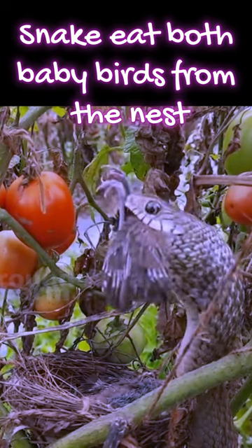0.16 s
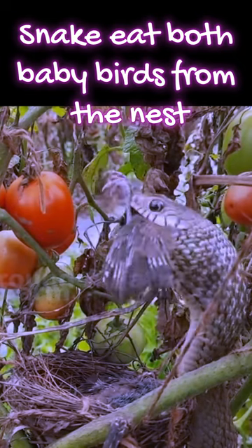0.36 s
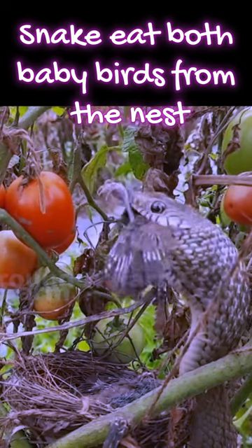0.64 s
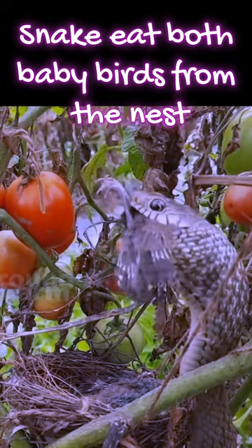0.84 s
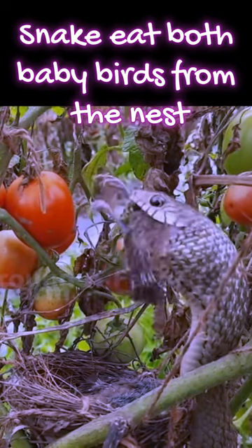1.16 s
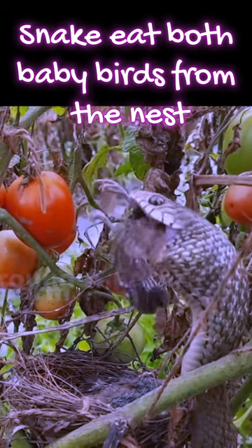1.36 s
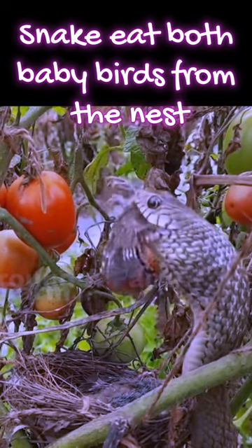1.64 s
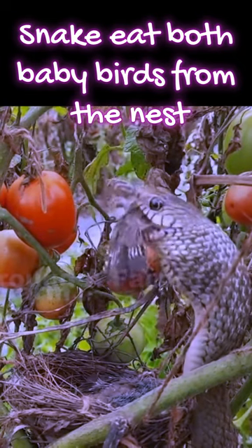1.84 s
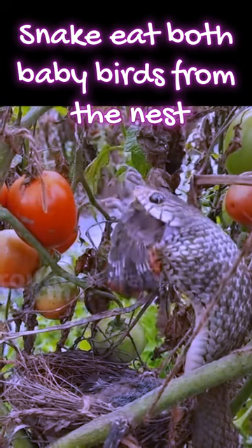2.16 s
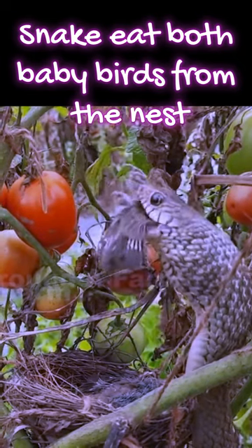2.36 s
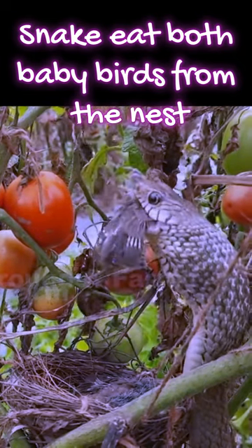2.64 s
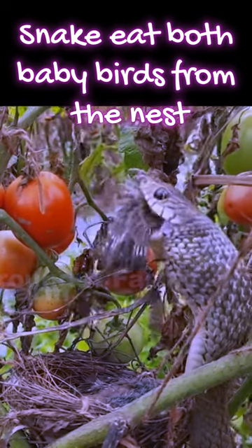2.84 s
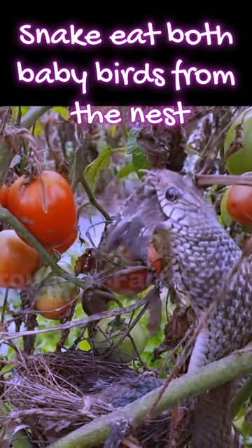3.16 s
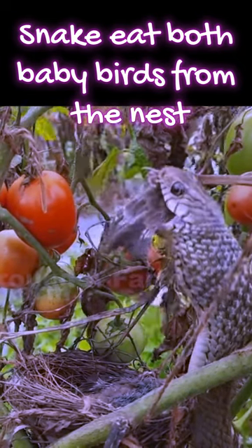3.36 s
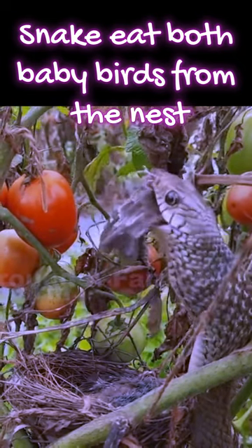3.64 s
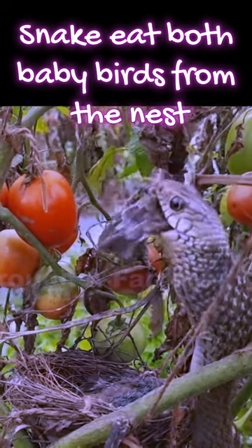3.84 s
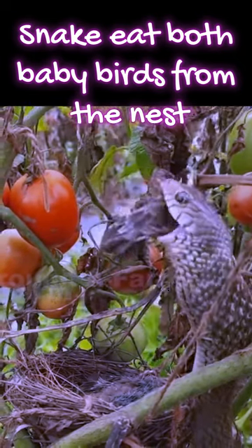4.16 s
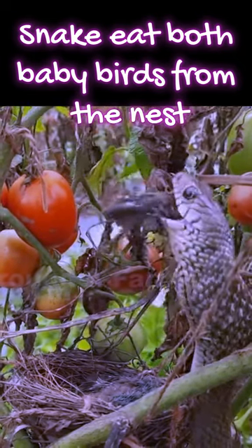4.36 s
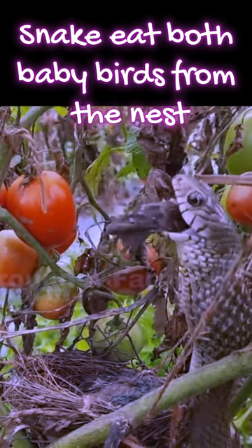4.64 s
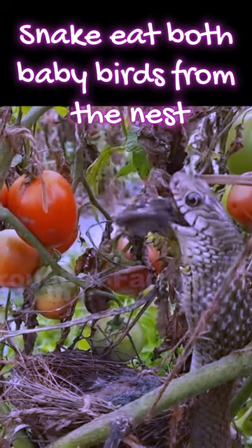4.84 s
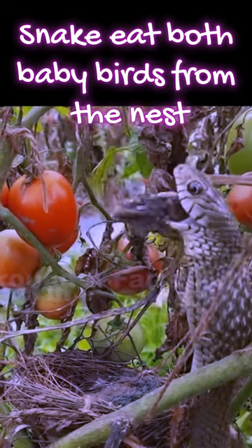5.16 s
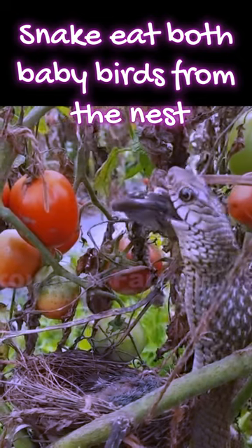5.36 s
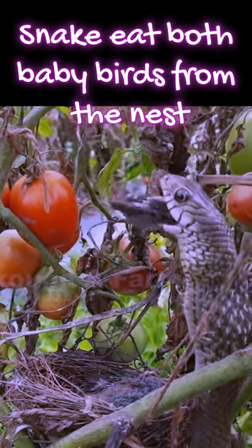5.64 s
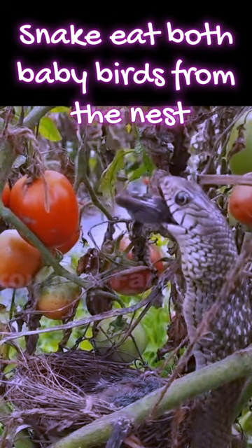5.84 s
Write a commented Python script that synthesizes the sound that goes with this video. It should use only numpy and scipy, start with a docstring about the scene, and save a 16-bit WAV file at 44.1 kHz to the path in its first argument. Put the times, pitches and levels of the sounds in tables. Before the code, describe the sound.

In a garden, one small bird scolds with very short, arched, slightly hoarse chirps in quick groups of three or four, with single notes between. It starts after almost a second of background. Beneath runs a deep, steady engine drone with a wavering low hum, distant traffic swelling and fading, and soft leaf hiss that turns brighter toward the middle. The stereo microphone hears the bird fairly close, slightly right, with little echo.

```python
"""Scolding bird in a vegetable garden

A small bird scolds in quick clusters of short arched chirps, harmonic tones with hiss, scattered by the plants.
A far engine drones near 63 Hz as a sum of sine orders; a wavering hum near 248 Hz, around the engine's
fourth order, booms and fades. Coloured noise makes distant traffic that swells and fades,
and foliage that hisses, with a brighter rustle of dry leaves toward the middle."""
import sys
import numpy as np
from scipy import signal
from scipy.fft import rfft, irfft
from scipy.io import wavfile
from scipy.ndimage import uniform_filter1d

SR = 44100
rng = np.random.default_rng(int(sys.argv[2]) if len(sys.argv) > 2 else 0)


def transcribe(signal):
    """Save signal, clipped to [-1, 1], as a 16-bit WAV file at the path in sys.argv[1]."""
    frames = np.atleast_2d(signal).T
    limited = np.clip(frames, -1, 1)
    pcm = np.round(limited * 32767).astype(np.int16)
    wavfile.write(sys.argv[1], SR, pcm)


N = 264732
TIME = np.arange(N) / SR


def from_db(db):
    """Logarithmic level: decibels become an amplitude ratio."""
    return 10 ** (np.asarray(db) / 20)


def rms_one(x):
    """Power normalization: scale to unit mean square."""
    return x / np.sqrt(np.mean(x ** 2) + 1e-20)


def in_time(rows):
    """Linear interpolation: each column of a curve at every sample."""
    seconds, *columns = np.transpose(rows)
    return [np.interp(TIME, seconds, column) for column in columns]


def at_hz(points, hz):
    """Logarithmic frequency scale: read a table in equal steps of pitch ratio."""
    table_hz, value = np.transpose(points)
    return np.interp(np.log(np.maximum(hz, 1)), np.log(table_hz), value)


def coloured(x, colour):
    """Zero-phase filtering: weight the spectrum by a table of (frequency [Hz], gain [dB])."""
    hz = np.arange(N // 2 + 1) * SR / N
    return irfft(rfft(x) * from_db(at_hz(colour, hz)), N)


def drift(corner_hz):
    """Low-pass noise: a random wander of rms 1 that slows as the corner is lowered."""
    hz = np.arange(N // 2 + 1) * SR / N
    spectrum = rfft(rng.standard_normal(N)) / (1 + (hz / corner_hz) ** 2)
    return rms_one(irfft(spectrum, N))


def add(out, start_s, sound):
    """Superposition: sum a short sound into the signal at its time."""
    i = int(start_s * SR)
    out[i:i + len(sound)] += sound


def outdoor_noise(colour, patchy_db, size=512):
    """Partial coherence: coloured noise at two microphones, uneven in patches of time and pitch; rms 1."""
    # coherence of the two channels: (frequency [Hz], likeness [clipped to 0-1])
    likeness = [(60, 2.6), (250, 0.23), (500, 1.14), (700, 0.7), (950, 0.9), (1300, 0.5), (1650, 0.08),
                (2300, 0), (3600, 0.29), (15000, -0.1)]
    # interchannel phase: (frequency [Hz], lead of left [rad])
    lead = [(60, 0.11), (350, 0.15), (550, 1.13), (700, 1.63), (870, 1.89), (1300, 2.65), (2000, 5.03),
            (3000, 4.7), (6800, 3.3), (15000, 3.7)]
    # interchannel level: (frequency [Hz], left minus right [dB])
    tilt_table = [(60, 1), (500, -0.5), (750, -2.5), (1500, -1.5), (2600, -1.5), (4500, -5), (6800, 0.5),
                  (8500, 0.5), (10500, -3), (12500, 3.5), (15000, 2.5)]
    hz, _, (a, b) = signal.stft(rng.standard_normal((2, N)), SR, nperseg=size * 2)
    hz = hz[:, None]
    alike = np.clip(at_hz(likeness, hz), 0, 1)
    right = alike * a + np.sqrt(1 - alike ** 2) * b
    right = right * np.exp(-1j * at_hz(lead, hz))
    tilt = from_db(at_hz(tilt_table, hz) / 2)   # half the difference on each side
    patches = uniform_filter1d(rng.standard_normal(a.shape), size=5, axis=1)   # along time
    patches = uniform_filter1d(patches, size=7, axis=0)   # along pitch
    gain = from_db(at_hz(colour, hz) + patchy_db * rms_one(patches))
    gain = gain * (hz < 2 * colour[-1][0])   # silent from an octave above the table
    pair = gain * np.array([a * tilt, right / tilt])
    return rms_one(signal.istft(pair, SR, nperseg=size * 2)[1][:, :N])


def bird(overhang=1.35, pip_s=0.004, onset=1.05, fade_db=1.8, crest=0.9):
    """Source-filter principle: arched harmonics through a beak resonance favouring the second, in hoarse hiss."""
    # chirps, before the bird's gain: (top of the arch [s], rise [s], fall [s],
    # top pitch of the strong second harmonic [Hz], its level [dB], level of the fundamental [dB])
    chirps = [(0.8232,0.0047,.006,3030,-29,-44), (0.886,.01,.013,3280,-32,-41),
              (0.9534,.01,0.015,3330,-33,-42), (1.0551,0.0095,0.0074,3145,-29,-46),
              (1.251,0.0051,0.0047,3080,-30,-46), (1.4635,.004,0.0035,3180,-27,-50),
              (1.7874,0.006,0.0036,3090,-33.5,-44), (1.8548,0.0081,.01,3280,-31.5,-42.5),
              (1.9225,0.011,.013,3236,-30,-41.5), (1.9797,0.01,0.015,3270,-32.5,-45.5),
              (2.514,0.0068,.004,3026,-30,-40), (2.583,0.012,0.015,3310,-32,-44),
              (2.6646,.01,0.0081,3180,-30.5,-46), (2.9686,.007,.0045,3090,-28,-45),
              (3.0783,.006,0.006,3200,-29.5,-44), (3.1375,0.014,0.012,3450,-32,-35),
              (3.218,0.012,0.014,3270,-32,-43), (3.4726,0.0041,0.003,3140,-27.5,-42),
              (4.1025,0.0038,0.0044,2665,-28.5,-48), (4.1703,.012,0.0068,3240,-31.5,-43.5),
              (4.2307,.012,.011,3270,-33,-45), (4.297,.013,.012,3127,-33.5,-47),
              (4.4618,0.0054,0.004,2980,-29,-46), (4.589,0.0078,.009,3230,-32.5,-45.5),
              (4.6939,0.0092,0.01,3315,-34,-46.5), (4.8724,0.0066,0.007,3380,-32.5,-41),
              (4.9868,0.0089,0.0075,3400,-34.5,-42), (5.0582,0.012,0.0067,3380,-34.5,-42),
              (5.1937,.011,.007,3450,-33,-40.5), (5.4702,0.0046,0.0051,3260,-30.5,-49),
              (5.567,0.01,0.006,3104,-31,-51)]
    # low pips that lead into some short chirps, before the bird's gain: (centre [s], pitch [Hz], level [dB])
    pips = [(1.242, 2090, -35.5), (2.505, 2140, -38), (2.958, 2230, -36), (3.464, 2190, -37),
            (4.094, 2100, -39), (5.461, 2210, -34), (5.556, 2050, -37)]
    # resonance of throat and beak: (frequency [Hz], gain [dB])
    beak = [(2000, -4), (2500, 5.5), (2850, 7), (3080, 6.5), (3300, -1), (3500, -1), (3900, -24),
            (4500, -14), (5200, -32)]
    # colour of the hoarse hiss: (frequency [Hz], relative level [dB])
    hoarse_colour = [(900, -18), (1550, -4), (1900, -4), (2700, -3), (3150, 8), (3600, -11), (4600, -16),
                     (6000, -24), (9000, -46)]
    # second harmonic at both ends of an arch; a higher power flattens the top and steepens the flanks
    foot_hz, arch_power = 2600, 2.4
    # rms unsteadiness: share of pitch, share of level, faster hoarse flutter as a share of level
    waver, rough, rasp = .009, .2, .13
    attack_s = .0016
    hoarse_db = -19.5   # rms, against a chirp of unit amplitude
    gain_db = 3.0

    out = np.zeros(N)
    wobble, shake, grit = drift(200), drift(220), drift(1400)
    hiss = rms_one(coloured(rng.standard_normal(N), hoarse_colour))
    for top_s, rise_s, fall_s, top_hz, db, fundamental_db in chirps:
        span = slice(int((top_s - 3 * rise_s) * SR), int((top_s + 3 * fall_s) * SR))
        t = TIME[span] - top_s
        u = t / np.where(t < 0, rise_s, fall_s)   # -1 to 1 across the arch
        drop = np.minimum(np.abs(u) ** arch_power, 2)
        second_hz = top_hz - (top_hz - foot_hz) * drop
        hz = second_hz / 2 * (1 + waver * wobble[span])
        phase = 2 * np.pi * np.cumsum(hz) / SR
        # the note opens quickly at the foot of the upsweep, then its effort weakens across the arch
        opening = (1 + np.tanh((t + onset * rise_s) / attack_s)) / 2
        closing = np.exp(-np.abs(np.maximum(u, 0) / overhang) ** 6)
        unsteady = 1 + rough * shake[span] + rasp * grit[span]
        effort = opening * closing * from_db(-fade_db * u) * unsteady
        # the resonance falls off upward, so high arches dim at the top
        harmonics = sum(from_db(at_hz(beak, k * hz)) * np.sin(k * phase) for k in (2, 3))
        voice = effort * harmonics
        voice = voice / np.sqrt(2 * np.mean(voice[np.abs(u) < 1] ** 2))
        # the fundamental comes out mainly near the top of the arch
        near_top = np.exp(-(u / crest) ** 2)
        fundamental = np.sqrt(2) * from_db(fundamental_db) * effort * near_top * np.sin(phase)
        # the hiss starts before the note and outlasts it
        hoarse = from_db(hoarse_db) * np.exp(-(u / 2) ** 4) * hiss[span]
        add(out, TIME[span.start], from_db(db) * (voice + hoarse) + fundamental)
    for centre_s, hz, db in pips:
        t = np.arange(-2 * pip_s, 2 * pip_s, 1 / SR)
        pip = np.exp(-(t / pip_s) ** 2) * np.sin(2 * np.pi * hz * t)
        add(out, centre_s - 2 * pip_s, from_db(db) * pip)
    return from_db(gain_db) * out


def unit_energy(h):
    """Energy normalization: scale each channel of a response to unit energy."""
    return h / np.sqrt(np.sum(h ** 2, axis=1, keepdims=True))


def garden(x, tail_s=0.0254, tail_t60_s=0.11, scatter_t60_s=.075, tail_db=-15.0, lead_s=0.0002):
    """Impulse-response convolution: direct sound, distinct reflections, dense plant scatter, faint tail."""
    # reflections from the ground and nearby plants: (delay [s], left [dB], right [dB])
    echoes = [(.0026, -24, -17), (.0116, -15, -26), (.0172, -19, -19)]
    # the bird leans right, most near 2.2 kHz; its low fundamental leans slightly left:
    # (frequency [Hz], left minus right [dB])
    bird_pan = [(1600, 1.5), (2200, -10), (3000, -4), (4600, -3.5)]
    # the left channel, where the bird is quieter, carries more of the plants' scatter: (left [dB], right [dB])
    scatter_db = (-6.5, -10.0)
    t = np.arange(SR // 2) / SR
    near, far = rng.standard_normal((2, 2, len(t)))
    scatter = unit_energy(near * from_db(-60 * t / scatter_t60_s) * (t > .001))
    tail = unit_energy(far * from_db(-60 * t / tail_t60_s) * (t > tail_s))
    response = from_db(scatter_db)[:, None] * scatter + from_db(tail_db) * tail
    for delay_s, left_db, right_db in echoes:
        response[:, int(delay_s * SR)] += from_db([left_db, right_db])
    direct = np.array([x, np.interp(TIME - lead_s, TIME, x)])   # left leads
    left, right = direct + signal.fftconvolve(x[None], response, axes=1)[:, :N]
    return np.array([coloured(left, [(hz, db / 2) for hz, db in bird_pan]),
                     coloured(right, [(hz, -db / 2) for hz, db in bird_pan])])


def engine(first_db=0.2, lead_s=0.00055):
    """Harmonic series of a far exhaust: the higher the order, the more it wavers on its way."""
    # drone, before first_db is added: (time [s], level of order 1 [dB])
    engine_level = [(0.05, -23), (0.51, -23.5), (1.17, -22), (1.78, -23.5), (2.38, -22.5), (3.02, -24),
                    (3.11, -23), (3.47, -21.5), (4.36, -26), (4.72, -23), (5.7, -27), (5.81, -25.5),
                    (5.98, -28.5)]
    # overtones swell and fade on their own:
    # (time [s], order 2 [dB], order 3 [dB], order 4 [dB], orders 5 and 6 each [dB])
    engine_overtones = [(0,-38,-45,-65,-46), (.4,-42.5,-67,-53,-70), (.8,-41.5,-67,-61,-57),
                        (1.15,-38,-61,-51,-54), (1.4,-40.5,-46,-47.5,-64), (1.7,-45.5,-65,-49,-72),
                        (2.1,-41,-64,-64,-71), (2.5,-41.5,-58,-45,-54), (2.9,-45,-58,-53,-63),
                        (3.25,-38,-48,-52,-71), (3.8,-35.5,-52,-54,-57), (4.4,-39,-42,-62,-66),
                        (5,-42,-42.5,-73,-89), (5.4,-41,-41,-68,-54), (5.62,-40.5,-55,-73,-48.5),
                        (6,-39,-71,-69,-78)]
    # the engine slowly picks up speed
    firing_hz, rise_hz_per_s = 62.26, .21
    rate = firing_hz + rise_hz_per_s * TIME
    phase = 2 * np.pi * np.cumsum(rate) / SR
    first, = in_time(engine_level)
    overtones = in_time(engine_overtones)
    levels = [first + first_db] + overtones + overtones[-1:]
    out = 0
    for k, db in enumerate(levels):
        unsteady = 1 + .05 * k * drift(6)
        slip = .08 * k * drift(4)   # phase wander [rad]
        out = out + np.sqrt(2) * from_db(db) * unsteady * np.sin((k + 1) * phase + slip)
    pan = from_db([[.35], [-.35]])
    return pan * np.array([out, np.interp(TIME - lead_s, TIME, out)])   # left leads


def hum(gain_db=-3.5, wander=0.0416):
    """Random frequency and amplitude modulation: a wavering hum around the engine's fourth order."""
    # the hum booms and fades; before gain_db is added: (time [s], level [dB])
    hum_level = [(0,-60), (.1,-33.5), (.3,-55.5), (.5,-35.5), (.65,-41), (.78,-36), (1,-40.5), (1.2,-50),
                 (1.4,-39.5), (1.8,-68), (2.25,-40.5), (2.45,-50.5), (2.7,-40.5), (3,-50.5), (3.45,-39),
                 (3.8,-49), (4.3,-54)]
    centre_hz, ends_s, fade_db_per_s = 248, 4, 29   # an extra fade sets in at ends_s
    level, = in_time(hum_level)
    level = level - fade_db_per_s * np.maximum(TIME - ends_s, 0)
    hz = centre_hz * (1 + wander * drift(25))
    phase = 2 * np.pi * np.cumsum(hz) / SR
    flutter = 1 + .55 * drift(25)
    return np.sqrt(2) * from_db(level + gain_db) * flutter * np.sin(phase)


def foliage(hiss_db=3.0, rustle_db=10.5, grain_db=1.0):
    """Friction noise: leaves hiss softly; dry ones brush each other in fine bright grains."""
    # soft leaves, before hiss_db is added: (time [s], level [dB])
    leaves = [(0.05, -42.5), (1.36, -44), (3.21, -43.5), (3.68, -46), (4.17, -45), (5.13, -47.5),
              (5.95, -48)]
    # dry leaves, before rustle_db is added: (time [s], level [dB])
    rustle = [(0.05, -66), (0.11, -63), (1.73, -67.5), (2.0, -59), (2.25, -61.5), (2.4, -53), (3.21, -56.5),
              (3.58, -61.5), (4.06, -63.5), (4.09, -60.5), (5.52, -69), (5.95, -67)]
    # spectra: (frequency [Hz], relative density [dB])
    hiss_colour = [(600, -13), (1200, -5), (1650, -0.5), (1950, 0.3), (2750, 2.5), (3200, -1.5), (3600, -5),
                   (4500, -5.5), (5500, -10), (6800, -19.5), (7500, -19), (8300, -12), (9700, -27),
                   (15500, -61)]
    rustle_colour = [(2000, -5.5), (4500, 5.5), (6900, -2), (8500, 2), (11000, -3), (15500, -3)]
    soft, = in_time(leaves)
    dry_leaves, = in_time(rustle)
    grains = grain_db * drift(110)   # unevenness in time [dB]
    hiss = from_db(soft + hiss_db) * outdoor_noise(hiss_colour, patchy_db=1.75)
    bright = from_db(dry_leaves + rustle_db + grains) * outdoor_noise(rustle_colour, patchy_db=1.5)
    return hiss + bright


def swell(start_s, hold_s, attack_s=0.084, release_s=0.18):
    """Exponential envelope: growth up to the start, hold, decay; time constants in seconds."""
    before = np.maximum(start_s - TIME, 0)
    after = np.maximum(TIME - start_s - hold_s, 0)
    return np.exp(-before / attack_s - after / release_s)


def background(rumble_db=-38.0, rumble_fade_db_per_s=0.1):
    """Power addition of incoherent noise: a low rumble, receding roar and tyre noise, and whooshing swells."""
    # swells of distant traffic: (start [s], hold [s], road roar [dB], tyre whoosh [dB])
    swells = [(0.107,0.13,-47,-47), (.32,0.32,-45,-41.5), (1.605,0.26,-43,-53), (2.07,0.22,-40.5,-44.5),
              (3.184,0.051,-43,-40.5), (3.45,0.059,-44,-48.5), (5.52,0.43,-46,-43.5)]
    # spectra: (frequency [Hz], relative density [dB])
    rumble_colour = [(15, -23), (30, -19), (42, -5), (82, 3), (110, -11.5), (160, -5.5), (200, -2),
                     (270, -10), (350, -10.5), (500, -35.5), (1000, -60)]
    road_colour = [(170, -13), (280, -11), (370, -6), (450, -4), (570, -5), (720, -12), (1100, -22),
                   (2000, -44)]
    tyre_colour = [(550, -41), (740, -3), (850, -3.5), (1000, -3.5), (1170, -8.5), (1400, -8),
                   (2200, -17.5), (3500, -46)]
    whoosh_colour = [(450, -19), (560, -5), (660, -12.5), (750, -10.5), (860, -6), (950, -12.5),
                     (1060, -17), (1500, -17)]
    # the traffic between the swells recedes steadily: level at the start, loss per second
    road_start_db, road_fade_db_per_s = -44, 0.5
    tyre_start_db, tyre_fade_db_per_s = -42.5, 2
    rumble = from_db(rumble_db - rumble_fade_db_per_s * TIME)
    road = from_db(road_start_db - road_fade_db_per_s * TIME)
    tyre = from_db(tyre_start_db - tyre_fade_db_per_s * TIME)
    whoosh = 0
    for start_s, hold_s, road_db, whoosh_db in swells:
        shape = swell(start_s, hold_s)
        road = np.hypot(road, from_db(road_db) * shape)
        whoosh = np.hypot(whoosh, from_db(whoosh_db) * shape)
    out = rumble * outdoor_noise(rumble_colour, patchy_db=2.0)
    out += road * outdoor_noise(road_colour, patchy_db=2.0)
    out += tyre * outdoor_noise(tyre_colour, patchy_db=3.0)
    return out + whoosh * outdoor_noise(whoosh_colour, patchy_db=1.5)


def scene():
    """Superposition: the bird among the plants, over engine, hum, leaves and traffic."""
    return garden(bird()) + engine() + hum() + foliage() + background()


def record(dry):
    """Band limiting: a steep elliptic low-pass removes the top of the spectrum."""
    cutoff_hz = 15780
    low_pass = signal.ellip(12, .1, 90, cutoff_hz, fs=SR, output="sos")
    return signal.sosfilt(low_pass, dry)


dry = scene()
out = record(dry)
transcribe(out)
```